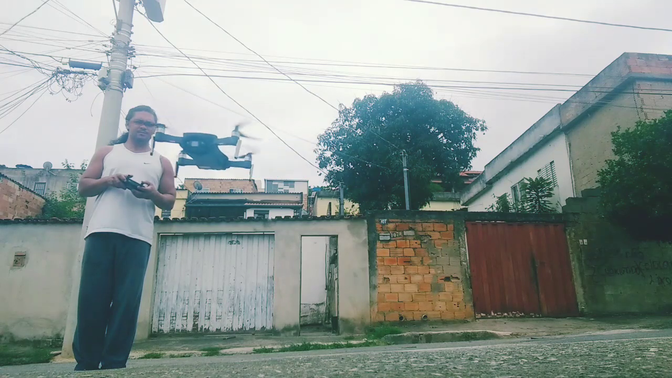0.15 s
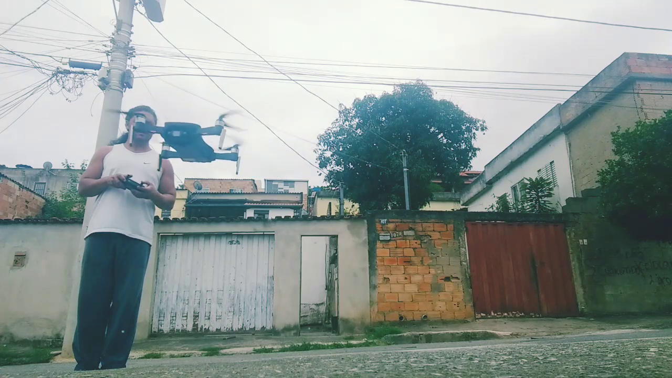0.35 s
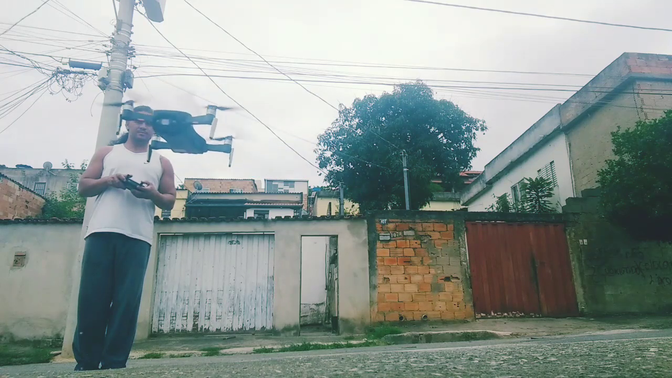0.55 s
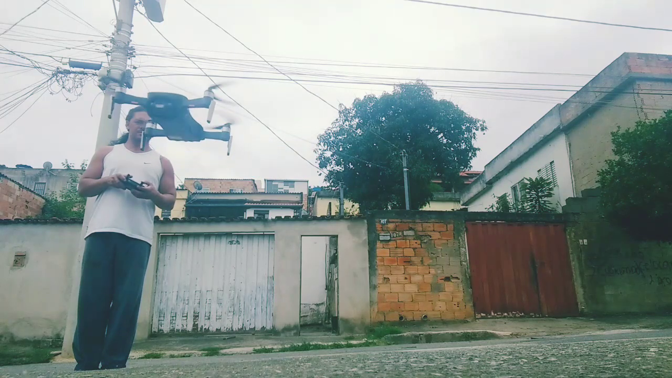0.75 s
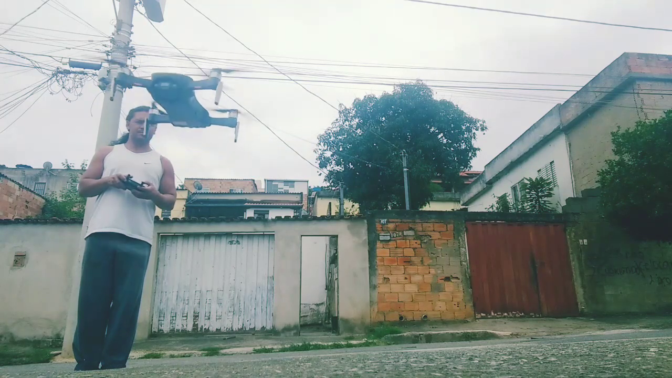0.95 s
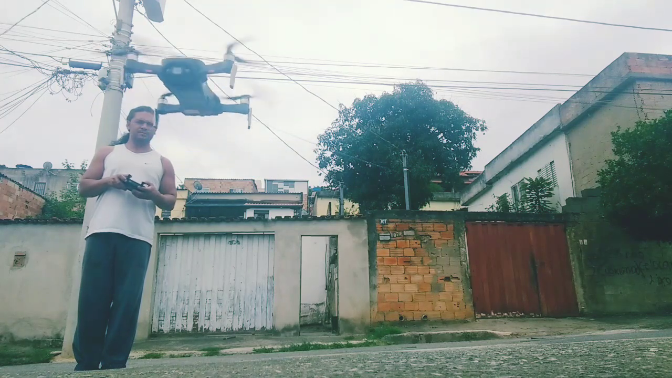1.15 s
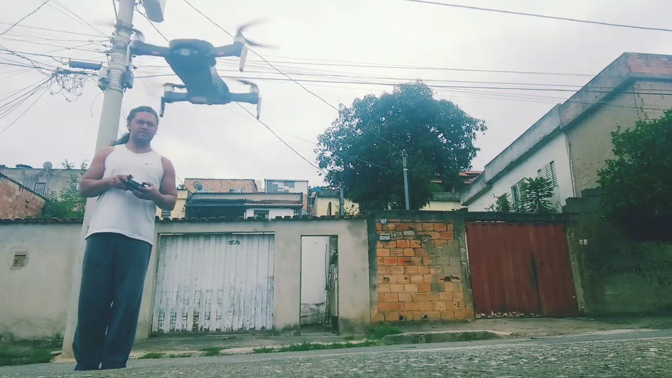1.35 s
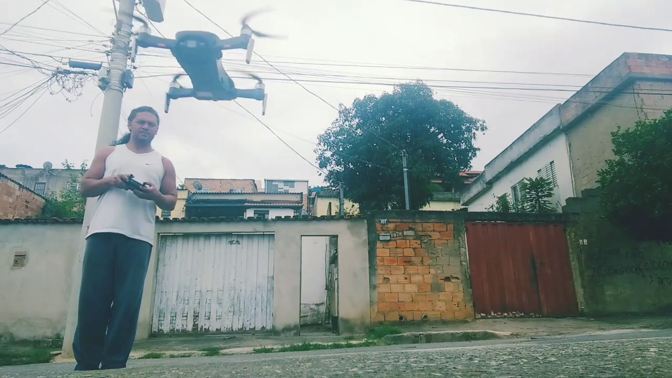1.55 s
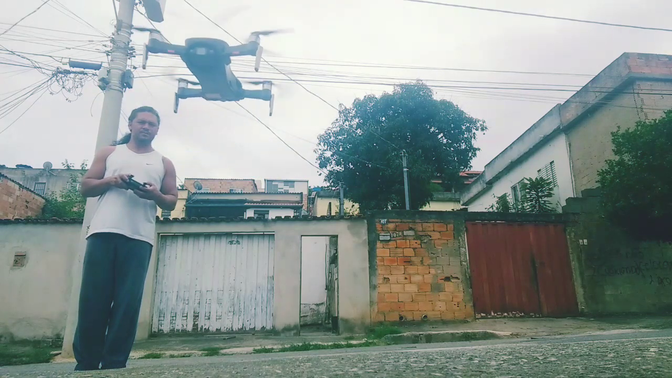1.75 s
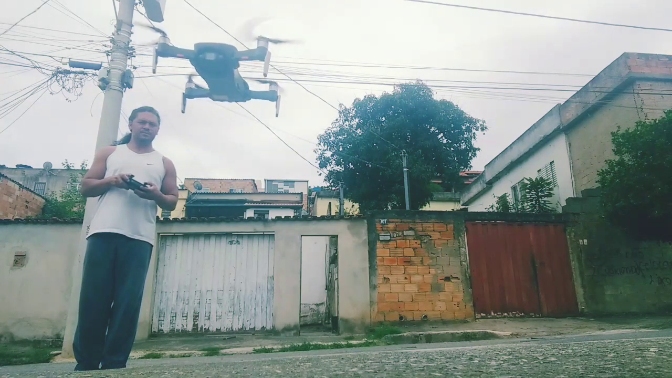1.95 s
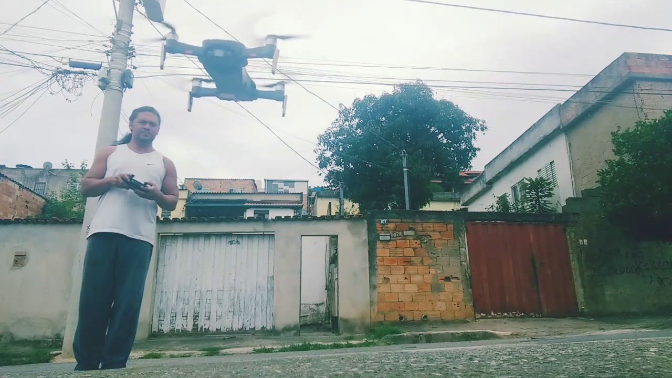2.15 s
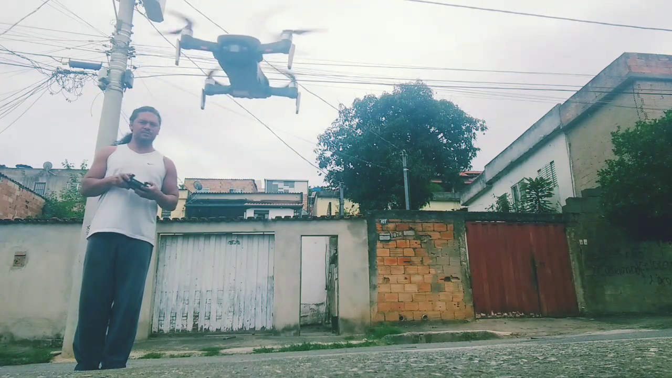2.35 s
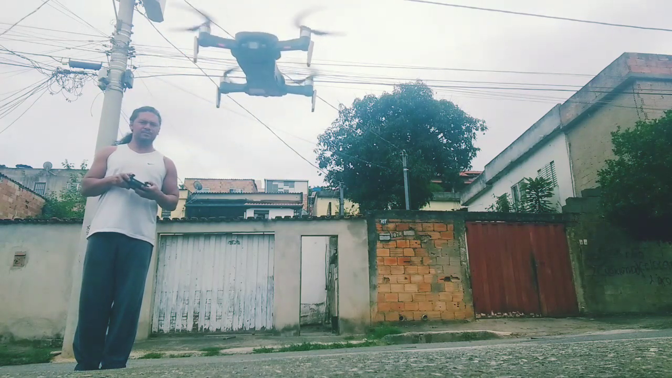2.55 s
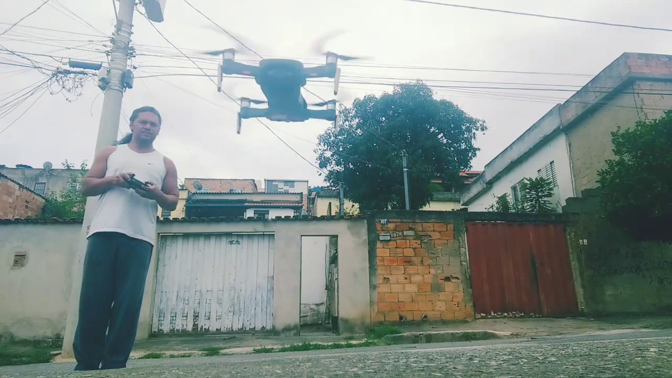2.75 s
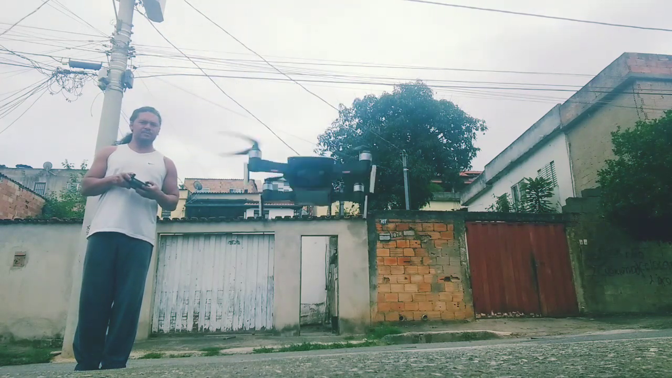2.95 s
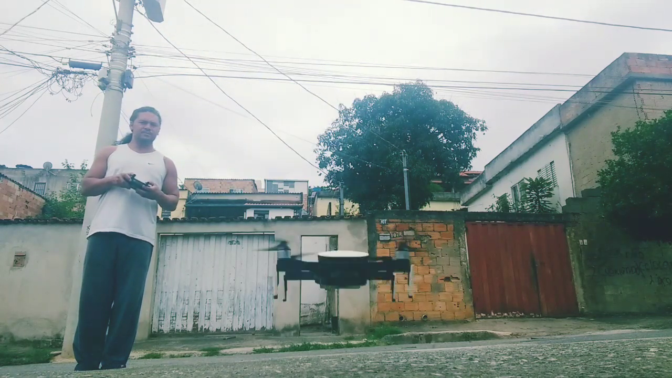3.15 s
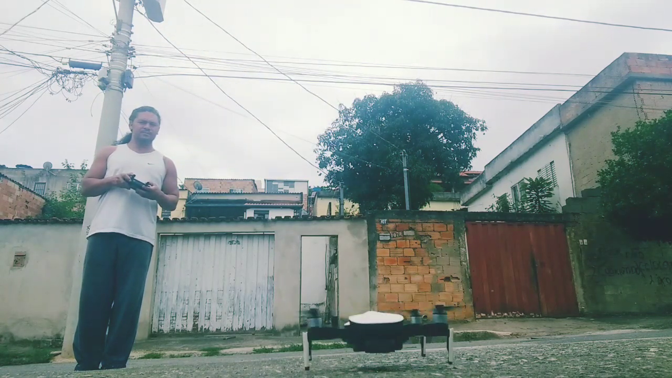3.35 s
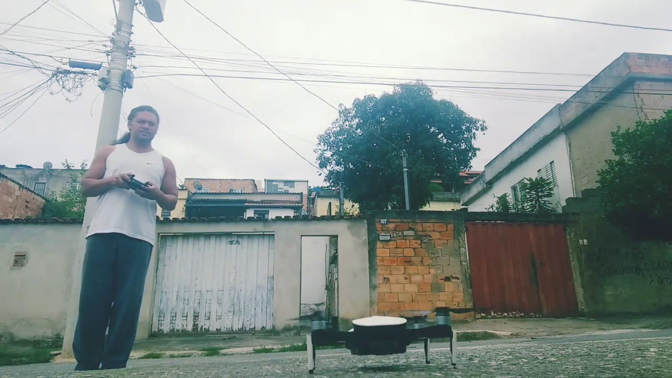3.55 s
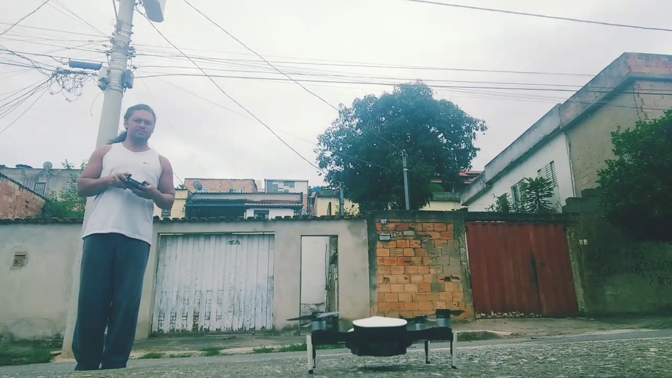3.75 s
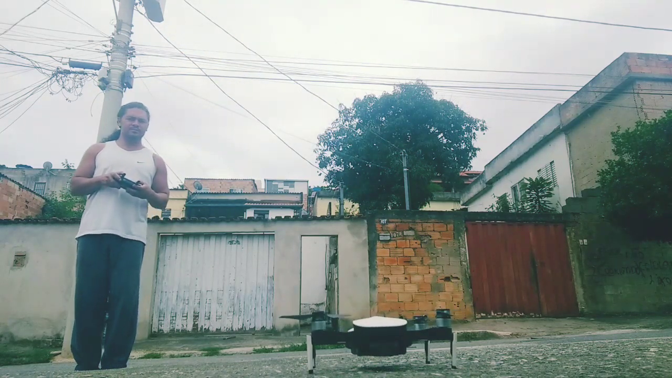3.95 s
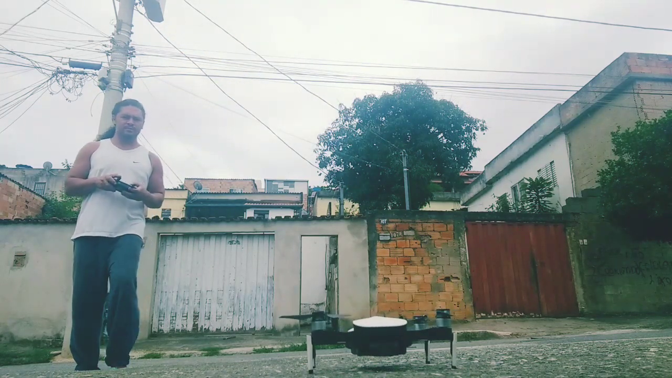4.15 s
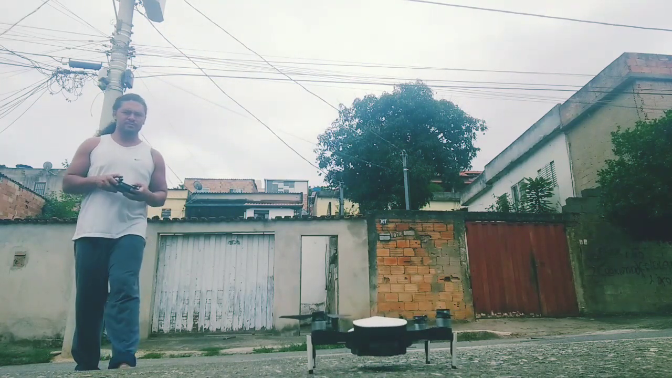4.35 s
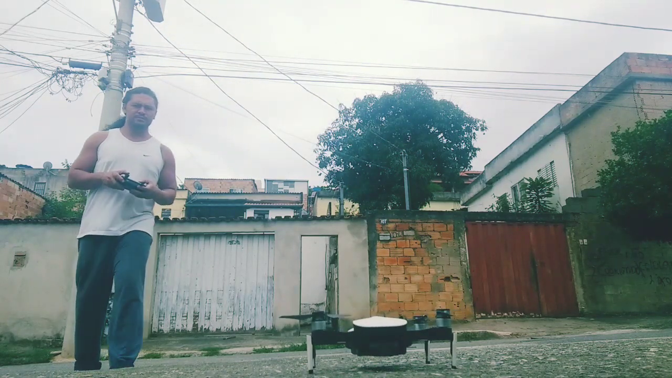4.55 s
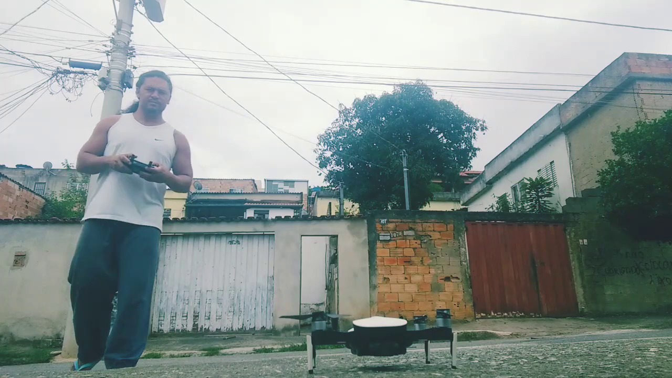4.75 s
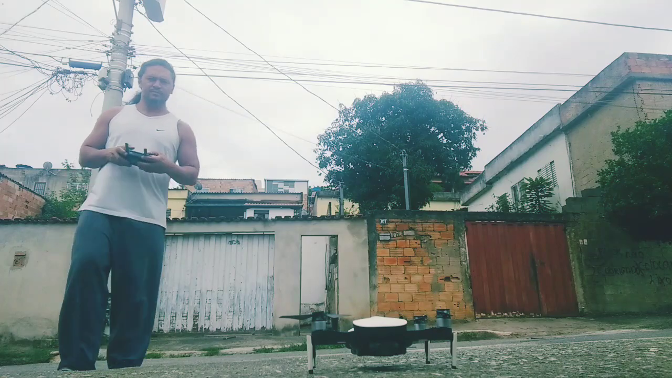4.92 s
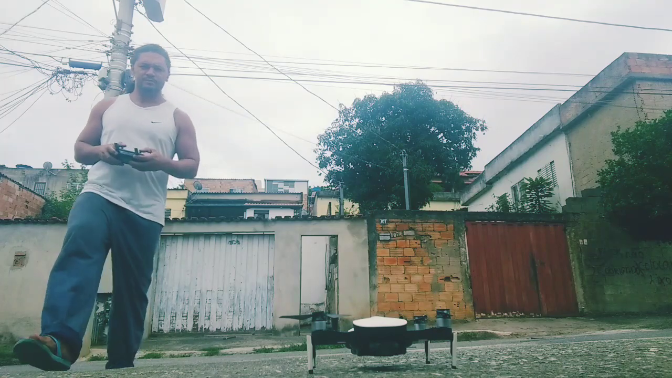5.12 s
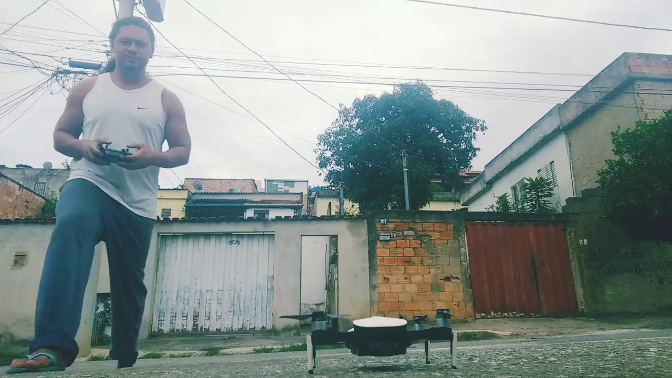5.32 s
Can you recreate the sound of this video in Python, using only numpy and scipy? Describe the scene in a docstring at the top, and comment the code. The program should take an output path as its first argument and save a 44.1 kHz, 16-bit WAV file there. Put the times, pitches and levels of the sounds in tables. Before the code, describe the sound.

A loud, wavering quadcopter buzz fills the first three and a half seconds, with airy hiss and irregular wind buffets striking a microphone near the ground. One brief rising chirp cuts through early. The rotors sag, surge, slow on touchdown and cut out abruptly. Then it is very quiet: a distant engine drone swelling under light hiss, soft bird notes and a few dragging footsteps on paving.

```python
"""A beating buzz and whine hovers close by, dips, sinks and stops: a quadcopter lands by a camera on the
ground. Its four rotors are overtone stacks at slightly different speeds, with chopped noise for the air they
push. Downwash thumps the two microphone ports as rumbling noise and short pressure pulses; a chirp cuts
through, and the plastic frame ticks as decaying noise. Then faint traffic with a droning engine under hiss
rises in level, a bird pipes gliding sine notes, and shoes scuff the paving in short bumps of noise."""
import sys
import numpy as np
from scipy.fft import rfft, irfft, next_fast_len
from scipy.io import wavfile
from scipy.ndimage import uniform_filter1d, minimum_filter1d, map_coordinates

SR = 44100
rng = np.random.default_rng(int(sys.argv[2]) if len(sys.argv) > 2 else 0)


def pcm_store(signal):
    """Save signal as 16-bit PCM."""
    levels = np.round(np.clip(np.atleast_2d(signal), -1, 1) * 32767)
    wavfile.write(sys.argv[1], SR, levels.astype(np.int16).T)


N = 237346
TIME = np.arange(N) / SR


def amp(db):
    """Decibels to gain."""
    return 10 ** (np.asarray(db) / 20)


def unit(x):
    """Scale to rms 1."""
    return x / np.sqrt(np.mean(x ** 2) + 1e-20)


def along(points, hz):
    """Read (frequency [Hz], value) points on a log frequency axis."""
    f, v = np.transpose(points)
    return np.interp(np.log(hz + 1e-3), np.log(f), v)


def curves(rows):
    """One value per sample for each column after the time; the end values are held."""
    s, *cols = np.transpose(rows)
    return [np.interp(TIME, s, c) for c in cols]


def wobble(rate):
    """A smooth random curve, rate knots a second."""
    return map_coordinates(rng.standard_normal(int(N * rate / SR) + 4), [TIME * rate])


def filtered(x, response):
    """x times a response of frequency."""
    size = next_fast_len(N + 8192)
    spectrum = rfft(x, size) * response(np.fft.rfftfreq(size, 1 / SR))
    return irfft(spectrum, size)[..., :N]


def noise(spectrum):
    """Coloured noise of rms 1, unrelated between the two ports."""
    return unit(filtered(rng.standard_normal((2, N)), lambda hz: amp(along(spectrum, hz))))


def bell(s, width):
    """A smooth bump in time."""
    return np.exp(-.5 * np.minimum(((TIME - s) / width) ** 2, 100))


def tone(phase, spread):
    """A partial that reaches the two ports with a phase difference [radians]."""
    start = rng.uniform(0, 2 * np.pi)
    ports = [phase + start - spread / 2, phase + start + spread / 2]
    return np.sin(np.array(ports, dtype=np.float32))


# base blade-passing rate in hover, dip, recovery, descent, idling and braking: (time [s], rate [Hz])
THROTTLE_POINTS = [(0, 367.9), (.6, 367.2), (1.2, 362.6), (2.64, 364.4), (2.68, 301.1), (2.73, 278.3),
                   (2.78, 300.2), (2.83, 328.4), (2.89, 355.2), (2.96, 363.1), (3.385, 350.8),
                   (3.45, 268.6), (3.53, 249.1), (3.6, 261.3), (3.72, 269.4), (3.92, 65.7)]
# rotors, the near one first: (hover speed [ratio], descent speed [ratio], part in rocking, part in tilting,
# part in turning, relative buzz level [dB], relative whine level [dB])
ROTOR_TRIMS = [(.99, .99, 0, 1, 0, .5, -12), (.979, .976, 1, .2, -.8, 1, 1.5),
               (.983, .945, .97, -.1, .8, -2.5, -3), (1.049, 1.057, -.9, .2, .8, -.5, -11)]
# how late each motor follows the throttle: (delay [s])
MOTOR_DELAYS = [0.00396, 0.00021, .014, .009]
# rocking to hold its place, one pair of rotors against the other: (time [s], share of speed [ratio])
ROCKING_POINTS = [(1.14, -0.0026), (1.22, -0.015), (1.33, 0.0075), (1.42, -0.014), (1.57, 0.035),
                  (1.68, -0.024), (1.8, .008), (2.02, -0.014), (2.14, 0.0017)]
# tilting towards the camera and back, mainly with the near rotor: (time [s], share of speed [ratio])
TILTING_POINTS = [(0, -0.0045), (.18, 0.0092), (.3, -0.00013), (.55, 0.0099), (.77, -0.019), (.87, 0.0078),
                  (1.02, -0.008), (1.14, 0.0059), (1.25, -0.02), (1.43, .012), (1.56, -0.027),
                  (1.69, 0.0023), (1.98, .011), (2.3, -0.0067), (2.63, -0.0039), (2.72, 0.036),
                  (2.82, -0.0056), (3.02, -0.0014), (3.15, -0.025)]
# turning pulls the two loudest motors apart, so their whines beat; on the ground they idle unequally:
# (time [s], share of speed [ratio])
TURNING_POINTS = [(1.8, -0.0004), (2.0, 0.006), (2.2, 0.0081), (2.64, 0.0037), (2.8, 0.0019),
                  (2.95, 0.0072), (3.1, 0.0056), (3.25, -0.007), (3.52, -0.012), (3.62, -.03),
                  (3.72, -0.037)]
DESCENT_S, DESCENT_BLEND_S = 3.02, .15  # start and length of the shift to descent speeds
WANDER, WANDER_RATE = .0025, 9  # own corrections: share of speed, knots a second


def rotor_rates(throttle_hz):
    """Each rotor's blade-passing rate: the throttle, followed a little late, trimmed and corrected all the time."""
    rocking, tilting, turning = [curves(p)[0] for p in (ROCKING_POINTS, TILTING_POINTS, TURNING_POINTS)]
    descent = np.clip((TIME - DESCENT_S) / DESCENT_BLEND_S, 0, 1)
    rates = []
    for (hover, sinking, rock, tilt, turn, _, _), late_s in zip(ROTOR_TRIMS, MOTOR_DELAYS):
        speed = hover + (sinking - hover) * descent
        speed = speed + rock * rocking + tilt * tilting + turn * turning
        speed = speed + WANDER * wobble(WANDER_RATE)
        rates.append(np.interp(TIME - late_s, TIME, throttle_hz) * speed)
    return rates


# how buzz, whine and hiss follow the rotors: (base level in hover [dB], slope [dB per octave of speed],
# part in the presence [ratio], fade after the power cut [dB/s])
BUZZ_RULE = (-34, 14, 1, 134)
WHINE_RULE = (-31.5, -1, 0.83, 403)
HISS_RULE = (-30.5, 15, 1, 354)
# louder and softer as the drone drifts and turns: (time [s], level [dB])
PRESENCE_POINTS = [(0, -0.5), (.22, 2.5), (.28, -2.5), (.6, -2.5), (.78, 1), (1, 1), (1.22, -2.5),
                   (1.7, 0.5), (2.3, -0.5), (2.66, -0.5), (2.9, 4.5), (3.2, -2), (3.39, 0), (3.7, -1)]
# level of the air rush before the fade: (time [s], level [dB])
RUSH_POINTS = [(0, -43), (.22, -37), (.28, -41.5), (.76, -33.5), (1.2, -33), (1.7, -31.5), (2.62, -35),
               (2.98, -41), (3.18, -35), (3.39, -32), (3.5, -42.5)]
# the whine comes and goes as the drone tips and sinks: (time [s], relative level [dB])
WHINE_POINTS = [(0, -2), (1.85, -2.5), (2.03, 1), (2.15, -1.5), (2.65, -1.5), (2.71, -12), (2.81, 0.5),
                (2.9, 0), (3.02, -6.5), (3.12, -30), (3.24, -0.5), (3.4, -1.5), (3.47, -4), (3.58, -0.5)]
CUT_S = 3.72  # the motors lose power
SURGE_DB, SURGE_RATE = 0.46, 13  # small shared surges of thrust: depth, knots a second
# just before the motors lose power, the buzz and hiss drop a little
DROP_S, DROP_FADE_S, BUZZ_DROP_DB, HISS_DROP_DB = 3.7, 0.024, 3.5, 2


def drone_levels(throttle_hz):
    """Buzz, whine, hiss and rush in dB: speed sets the first three, and all fade once the power is cut."""
    octaves = np.log2(throttle_hz / throttle_hz[0])
    presence_db = curves(PRESENCE_POINTS)[0] + SURGE_DB * wobble(SURGE_RATE)
    unpowered_s = np.maximum(TIME - CUT_S, 0)
    buzz, whine, hiss = [db + per_octave * octaves + part * presence_db - fade * unpowered_s
                         for db, per_octave, part, fade in (BUZZ_RULE, WHINE_RULE, HISS_RULE)]
    drop = np.clip((TIME - DROP_S) / DROP_FADE_S, 0, 1)
    rush = curves(RUSH_POINTS)[0] - HISS_RULE[-1] * unpowered_s
    whine = whine + curves(WHINE_POINTS)[0]
    return buzz - BUZZ_DROP_DB * drop, whine, hiss - HISS_DROP_DB * drop, rush


# high blade overtones, duller as the drone sinks: (time [s], relative level [dB])
EDGE_POINTS = [(0, -2), (.7, 0.5), (2.6, 2.5), (2.72, 1.5), (3.0, -4.5), (3.3, -2), (3.55, -1)]
# phase of the buzz between the ports: (frequency [Hz], phase [radians])
BUZZ_PHASE = [(360, 0.59), (720, 1.04), (1080, 1.52), (1800, 2.29), (2170, 1.96), (2550, 7.2), (2900, 7.8),
              (3250, 1.54), (4000, 1.44), (4700, 2.64), (5100, 2.5), (5500, 1.86), (6400, 1.6)]
# phase of the whine between the ports: (frequency [Hz], phase [radians])
WHINE_PHASE = [(4700, 1.45), (6400, 1.54)]


def rotor(rate_hz, overtones, jitter=0.00139, hunting=4, flicker_db=1.2, edge_hz=2500,
          imbalance=0.15, whine_sway=0.12, slow_db=3, count=24):
    """One propeller and its motor: blade buzz, whine and the phase of the blades."""
    # the speed trembles more while the throttle is changing
    change = uniform_filter1d(np.abs(np.gradient(np.log(rate_hz))) * SR, size=2000)
    tremble = jitter * (1 + hunting * np.minimum(change, 2)) * wobble(90)
    phase = 2 * np.pi * np.cumsum(rate_hz * (1 + tremble)) / SR
    # slower blades lose their high overtones
    fade_db = slow_db * (1 - rate_hz / rate_hz[0])
    # the low overtones follow only the negative part of the edge curve, and by half
    edge_db = curves(EDGE_POINTS)[0]
    hum_db = .5 * np.minimum(edge_db, 0)
    buzz = 0
    for k in range(1, count + 1):
        hz = k * rate_hz[0]
        level_db = along(overtones, k) - fade_db * np.log2(k) + (edge_db if hz > edge_hz else hum_db)
        # turbulent inflow loads the blades unevenly; the high overtones flicker most
        level_db = level_db + flicker_db * np.sqrt(k) * wobble(31.9)
        buzz = buzz + amp(level_db) * tone(k * phase, along(BUZZ_PHASE, hz))
    pulls = 18  # magnetic pulls of the motor per blade pass
    whine = amp(1.1 * wobble(24.8)) * tone(pulls * phase, along(WHINE_PHASE, pulls * rate_hz))
    # two unequal blades add sidebands at the shaft rate
    sway = np.cos(phase / 2)
    return (1 + imbalance * sway) * buzz, (1 + whine_sway * sway) * whine, phase


# blade-pass overtones of the near, the two middle and the fastest rotor: (multiple, relative level [dB])
NEAR_OVERTONES = [(1, 1.5), (2, -3.5), (3, 4.5), (4, -5), (5, -8), (6, 0.5), (7, -27), (8, -15), (9, -11.5),
                  (10, -13), (11, -9.5), (12, -6.5), (13, -13), (14, -6), (15, -9), (17, -9.5), (19, -9),
                  (22, -24), (24, -30)]
FAR_OVERTONES = [(1, -8), (2, -1), (3, -7.5), (4, -6), (5, -2), (8, -7), (10, -15), (12, -18), (16, -10),
                 (20, -21.5), (30, -52)]
FAST_OVERTONES = [(1, -6), (2, 1), (3, -8.5), (4, -13), (5, -68), (8, -45), (10, -22), (16, -11), (20, -22),
                  (30, -59)]
# near rotor's buzz, which turns away as the drone sinks: (time [s], relative level [dB])
NEAR_POINTS = [(1.2, 1.5), (1.6, 0), (2.0, -0.5), (2.65, -1.5), (2.88, -1), (3.0, 1.5), (3.15, -2),
               (3.35, -8), (3.45, -7)]
NEAR_DB_PER_OCTAVE = 3.5  # extra loss of the near buzz per octave of slowing
# colour of the air rush: (frequency [Hz], relative level [dB])
RUSH_COLOUR = [(150, -12), (500, -11), (1200, 13.5), (1700, 0.5), (2000, -31), (2750, -49), (3100, -2),
               (3600, 9.5), (4500, 15.5), (6000, 13), (7000, 3), (8500, -34), (10500, 9.5), (13000, -51)]
# colour of the blade hiss: (frequency [Hz], relative level [dB])
HISS_COLOUR = [(4000, -44), (6500, 3), (8000, 7.5), (10000, 1.5), (12000, -0.5), (14500, -7.5)]
# top treble of the hiss aimed at the camera: (time [s], relative level [dB])
SHEEN_POINTS = [(0, 6), (.8, 7.5), (1.3, -6), (1.8, -9), (2.65, -7), (2.9, -2), (3.15, -27), (3.7, 0)]
# air spilling over the paving once the drone is low: (frequency [Hz], relative level [dB])
SPILL_COLOUR = [(1200, -18), (1900, -7.5), (2500, -6), (3000, 0), (3600, -10.5), (5000, -18)]
# strength of that spill: (time [s], level [dB])
SPILL_POINTS = [(2.7, -44), (3.05, -31), (3.35, -28.5), (3.55, -32.5), (3.72, -32.5), (3.8, -49),
                (4.0, -97)]
# lag of the ground echo: (time [s], lag [ms])
GROUND_LAG = [(0, 0.044), (.6, 0.045), (1.3, 0.062), (2.6, 0.063), (2.9, 0.053), (3.1, 0.058), (3.3, 0.049),
              (3.7, 0.045)]
# port balance, positive to the right: (frequency [Hz], level [dB])
LEAN_EQ = [(300, 1.5), (1200, -0.5), (3000, 0), (6000, 2), (9000, 2), (13000, 3)]


def drone(chop=0.12, echo=0.69):
    """Four rotors beat against each other; the blades chop the air that they push."""
    throttle_hz = curves(THROTTLE_POINTS)[0]
    buzz_level, whine_level, hiss_level, rush_level = drone_levels(throttle_hz)
    near_db = curves(NEAR_POINTS)[0] + NEAR_DB_PER_OCTAVE * np.log2(throttle_hz / throttle_hz[0])
    blades = (NEAR_OVERTONES, FAR_OVERTONES, FAR_OVERTONES, FAST_OVERTONES)
    out, phases = np.zeros((2, N)), []
    for i, rate_hz in enumerate(rotor_rates(throttle_hz)):
        own_buzz_db, own_whine_db = ROTOR_TRIMS[i][-2:]
        buzz, whine, phase = rotor(rate_hz, blades[i])
        out += amp(buzz_level + own_buzz_db + (0 if i else near_db)) * buzz
        out += amp(whine_level + own_whine_db) * whine
        phases.append(phase)
    chopping = unit(1 + chop * (np.cos(phases[0]) + np.cos(phases[1])))
    # the highest treble is beamed, so it changes with the drone's angle
    hiss = noise(HISS_COLOUR)
    treble = filtered(hiss, lambda hz: 1 / (1 + (11800 / (hz + 1)) ** 12))
    hiss += (amp(curves(SHEEN_POINTS)[0]) - 1) * treble
    air = amp(rush_level) * noise(RUSH_COLOUR)
    air += amp(hiss_level + 1.33 * wobble(24.19)) * hiss
    air += amp(curves(SPILL_POINTS)[0]) * noise(SPILL_COLOUR)
    air *= chopping
    # the paving right under the camera adds an echo that combs the treble as the drone moves
    lag_s = curves(GROUND_LAG)[0] / 1000
    air += echo * np.array([map_coordinates(port, [(TIME - lag_s) * SR]) for port in air])
    return filtered(out + air, lambda hz: amp(np.outer([-1, 1], along(LEAN_EQ, hz))))


# strength of the downwash at the ports: (time [s], relative level [dB])
WASH_POINTS = [(0, -14.5), (.55, -19.5), (1, -9.5), (1.3, -11), (1.6, -9.5), (1.9, -13.5), (2.55, -9.5),
               (2.8, -17), (3, -6.5), (3.12, -14), (3.28, -5), (3.5, -18), (3.6, -35.5), (3.73, -17.5),
               (3.92, -31), (4.2, -49)]
# colour of the rumble, also inside the eddies: (frequency [Hz], relative level [dB])
RUMBLE_COLOUR = [(20, -57), (40, -10), (70, -1.5), (110, 3.5), (200, 3), (350, -4), (600, -10.5),
                 (1000, -18), (1600, -24.5), (2500, -44), (5000, -60)]


def downwash(wash_db=-17, lumps_db=4.5, gust_db=2.5):
    """Lumpy turbulence rumbles on each port between the strong eddies."""
    flow_db = curves(WASH_POINTS)[0] + gust_db * wobble(10.22)
    lumps = amp(lumps_db * np.array([wobble(70), wobble(70)]))
    churn = unit(noise(RUMBLE_COLOUR) * lumps)
    # slow air makes only large, dull eddies
    dull = filtered(churn, lambda hz: 1 / (1 + (hz / 260) ** 4))
    brisk = np.clip((flow_db + 29.5) / 14, 0, 1)
    return amp(flow_db + wash_db) * (dull + brisk * (churn - dull))


def distant(x, apart):
    """Far sound reaches both ports alike in the bass; apart sets their difference."""
    difference = filtered(x[1], lambda hz: amp(along(apart, hz)))
    return np.array([x[0] + difference, x[0] - difference])


# faint street; its level rises after the drone is still: (time [s], relative traffic [dB], relative hiss [dB])
STREET_POINTS = [(3.95, -50, -49.5), (4.4, -42.5, -45), (5, -34.5, -41), (5.38, -36, -46)]
# colour of the traffic: (frequency [Hz], relative level [dB])
TRAFFIC_COLOUR = [(25, -24), (55, -3), (90, -1), (160, 0), (220, -4.5), (400, -4), (650, -5), (1000, -9),
                  (1400, -12), (2000, -9.5), (2800, -3.5), (5000, -46.5)]
# colour of the light hiss: (frequency [Hz], relative level [dB])
AIR_COLOUR = [(1500, -4), (2700, 4.5), (3700, -0.5), (4900, 0.5), (5400, -5.5), (6200, -16.5), (6430, -4),
              (6650, -14), (8000, -21), (11000, -35), (14500, -49)]
# partials of the far engine drone: (centre frequency [Hz], relative level [dB])
ENGINE_PARTIALS = [(89, -0.5), (124, -4), (168, -6), (268, -5), (340, -8)]


def street(traffic_db=-1, engine_db=-6, air_db=0, left_db=0.67):
    """Far traffic is coloured noise with one engine of wavering sines, under a light hiss."""
    traffic_level, air_level = curves(STREET_POINTS)
    engine = 0
    for hz, db in ENGINE_PARTIALS:
        level = amp(db + 2.3 * wobble(6.1))
        phase = 2 * np.pi * np.cumsum(hz * (1 + 0.0147 * wobble(14))) / SR
        engine = engine + level * np.sin(phase)
    apart = [(80, -29.0), (200, -10.0), (400, -6.5), (900, 4.5), (1500, -1.5)]  # (frequency [Hz], level [dB])
    roar = distant(noise(TRAFFIC_COLOUR), apart)
    low = amp(traffic_level) * (amp(traffic_db) * roar + amp(engine_db) * engine)
    hiss = amp(air_level + air_db) * noise(AIR_COLOUR) * amp([[1], [2.5]])
    return low * amp([[left_db], [-left_db]]) + hiss


def push(t, span):
    """Pressure of one eddy passing a port at t = 0: a suction between two humps."""
    return ((t / span) ** 2 - 1) * np.exp(-.5 * np.minimum((t / span) ** 2, 100))


def burst(x, t, length):
    """A short piece of turbulence around t = 0, with rms 1 at its height."""
    envelope = np.exp(-np.minimum((2 * t / length) ** 2, 100))
    return x * envelope * np.sqrt(np.sum(envelope ** 2) / np.sum((x * envelope) ** 2))


# strongest eddies that strike a port: (time [s], length [s], relative rumble [dB], relative flutter [dB])
EDDY_HITS = [(0.025, 0.023, -38, -38.5), (0.104, 0.013, -26.5, -24.5), (0.144, 0.015, -25, -30),
             (0.249, 0.014, -10, -29), (0.342, 0.033, -31, -36), (0.434, 0.027, -14.5, -22),
             (0.498, 0.012, -24, -34), (0.594, 0.011, -22, -47), (0.672, 0.01, -15, -18),
             (0.751, 0.027, -22, -24.5), (0.832, 0.012, -16, -20), (0.878, 0.018, -24, -30),
             (0.934, 0.014, -23, -36), (0.978, 0.022, -16.5, -22), (1.088, 0.017, -21, -15.5),
             (1.147, 0.011, -15, -24), (1.197, 0.012, -27, -19), (1.262, 0.022, -24, -18),
             (1.295, 0.024, -21.5, -20), (1.332, 0.022, -25, -15.5), (1.39, 0.027, -17, -23),
             (1.445, 0.014, -14, -21), (1.517, 0.024, -22, -21), (1.593, 0.018, -23.5, -21),
             (1.634, 0.02, -21, -17), (1.668, 0.018, -30, -24), (1.707, 0.012, -26, -23),
             (1.744, 0.018, -20, -15), (1.781, 0.0089, -17, -19.5), (1.828, 0.01, -33, -22),
             (1.868, 0.01, -31, -19.5), (1.909, 0.013, -33, -20.5), (2.044, 0.02, -14.5, -16.5),
             (2.09, 0.015, -23, -21.5), (2.173, 0.024, -25, -23), (2.216, 0.014, -16.5, -44),
             (2.274, 0.036, -25.5, -31), (2.309, 0.012, -12, -22), (2.342, 0.018, -24, -23),
             (2.412, 0.0079, -31, -12), (2.531, 0.016, -21, -16), (2.581, 0.011, -14, -16),
             (2.617, 0.017, -20, -24), (2.659, 0.018, -17, -22), (2.761, 0.02, -19, -24.5),
             (2.818, 0.015, -19, -23), (2.932, 0.016, -19, -15.5), (2.981, 0.023, -20.5, -19),
             (3.033, 0.022, -14, -22), (3.065, 0.018, -21.5, -10.5), (3.153, 0.019, -25, -19.5),
             (3.178, 0.026, -31, -23), (3.246, 0.024, -32, -17), (3.299, 0.024, -23, -16),
             (3.326, 0.027, -26, -18), (3.362, 0.032, -27, -20.5), (3.427, 0.018, -21.5, -35),
             (3.511, 0.014, -19, -29)]
# last slow swirls of air as the blades stop: (time [s], relative level [dB])
SWIRL_HITS = [(3.714, -14), (3.732, -17), (3.772, -23), (3.796, -29), (3.823, -20), (3.875, -20.5),
              (3.921, -20.5)]
# colour of a fast eddy tearing at a port: (frequency [Hz], relative level [dB])
FLUTTER_COLOUR = [(60, -22.5), (150, -5), (350, 4), (600, 2), (1000, -4.5), (1600, -14), (2500, -59),
                  (5000, -55)]


def eddies(push_db=3, rumble_db=-1, snap_db=7.5, flutter_db=-1, spill=0.24, push_share=0.099,
           snap_width=0.00041, swirl_db=-14.0, swirl_width=0.0024, swirl_rumble_db=-16, swirl_length_s=0.025):
    """Each eddy strikes one port with a push and a snap, in a burst of rumble and flutter; long ones push slowly."""
    out, rumble, flutter = np.zeros((2, N)), noise(RUMBLE_COLOUR), noise(FLUTTER_COLOUR)
    for (s, length, low_db, high_db), side in zip(EDDY_HITS, rng.random(len(EDDY_HITS))):
        port, near = int(side > .5), np.abs(TIME - s) < 2 * length
        t = TIME[near] - s
        out[port, near] += amp(low_db + push_db) * push(t, push_share * length)
        out[port, near] += amp(low_db + rumble_db) * burst(rumble[port, near], t, length)
        out[port, near] += amp(high_db + flutter_db) * burst(flutter[port, near], t, length)
        snap = amp(high_db + snap_db) * push(t, snap_width)
        out[port, near] += snap
        # part of the snap carries over to the other port
        out[1 - port, near] += spill * snap
    for (s, db), side in zip(SWIRL_HITS, rng.random(len(SWIRL_HITS))):
        port, t = int(side > .5), TIME - s
        out[port] += amp(db + swirl_db) * push(t, swirl_width)
        out[port] += amp(db + swirl_rumble_db) * burst(rumble[port], t, swirl_length_s)
    return out


def chirp(at_s=0.65, length_s=0.028, pitch_hz=1730, rise_hz_per_s=9000, db=-34):
    """One brief sine of rising pitch cuts through the hover."""
    t = np.clip(TIME - at_s, -4 * length_s, 4 * length_s)
    phase = 2 * np.pi * (pitch_hz * t + .5 * rise_hz_per_s * t ** 2)
    return amp(db) * bell(at_s, length_s / 2) * tone(phase, 0.66)


# short dry ticks of the plastic frame, one in the hover and the rest around the landing:
# (time [s], relative level [dB])
TICK_HITS = [(.661, -12), (3.3854, -12), (3.5175, -9.5), (3.603, -16.5), (3.7151, -18), (3.754, -25)]


def frame_and_brakes(tick_db=-6.0, t60=0.034, squeak_hz=4480, squeak_db=-36, coast_db=-54, brake_s=3.789,
                     squeak_width=0.01, rasp_db=-44, rasp_width=0.022):
    """The plastic frame ticks; the motors squeak and rasp as they brake and sing faintly while they coast."""
    blows = sum(amp(db + tick_db - 60 * np.abs(TIME - s) / t60) * (TIME >= s) for s, db in TICK_HITS)
    # noise colours: (frequency [Hz], relative level [dB])
    plastic = noise([(300, -50), (1500, 4), (4000, 3.0), (7000, -8.5), (14000, -27)])
    grind = noise([(600, -21), (1300, 3), (3000, -12), (4600, -1), (6500, -11), (9000, -10), (14000, -39)])
    rasp = amp(rasp_db) * bell(brake_s + rasp_width / 2, rasp_width) * grind
    squeak = tone(2 * np.pi * np.cumsum(squeak_hz * (1 + 0.0171 * wobble(400))) / SR, 0.47)
    squeak_level = amp(squeak_db) * bell(brake_s, squeak_width) + amp(coast_db) * bell(3.99, 0.12)
    return blows * plastic + rasp + squeak_level * squeak


# piped notes: (time [s], length [s], relative level [dB])
BIRD_NOTES = [(3.854, 0.054, -53), (3.933, 0.047, -55), (4.016, 0.047, -50), (4.163, .07, -46),
              (4.312, 0.072, -45.5), (4.471, 0.033, -39.5), (4.63, 0.047, -39.5)]


def bird(top_hz=1562, droop_hz=45, linger_db=-13, linger_s=0.051):
    """A run of slightly arched piping notes from far away, lingering between the house walls."""
    arch = sum(bell(s, length / 2) for s, length, db in BIRD_NOTES)
    held = sum(amp(db) / (1 + ((TIME - s) / (length / 2)) ** 6) for s, length, db in BIRD_NOTES)
    echoes = sum(amp(db + linger_db) * bell(s + length, linger_s) for s, length, db in BIRD_NOTES)
    pitch_hz = top_hz - droop_hz * (1 - arch) + 11 * wobble(140)
    piping = tone(2 * np.pi * np.cumsum(pitch_hz) / SR, 1.4)
    return amp(1.8 * wobble(70)) * (held + echoes) * piping


# shoe scuffs: (time [s], relative level [dB])
SCUFF_HITS = [(4.47, -49), (4.78, -63), (4.95, -43), (5.30, -46)]
# colour of the grit: (frequency [Hz], relative level [dB])
SCUFF_COLOUR = [(1500, -22), (3500, 11), (5000, 4), (8000, -7), (14000, -20)]


def footsteps(width=0.033):
    """Soles drag briefly over grit: bumps of coloured noise with a rough level."""
    drags = sum(amp(db) * bell(s, width) for s, db in SCUFF_HITS)
    return drags * noise(SCUFF_COLOUR) * amp(2.8 * wobble(300))


def scene():
    """Everything that reaches the two ports."""
    wind = (downwash() + eddies()) * amp([[-1.5], [1.5]])
    return drone() + wind + street() + chirp() + frame_and_brakes() + bird() + footsteps()


def limited(x, ceiling=0.93):
    """A look-ahead limiter ducks everything briefly around the largest thumps."""
    needed = np.minimum(1, ceiling / (np.abs(x).max(axis=0) + 1e-9))
    held = minimum_filter1d(needed, size=201)
    return x * uniform_filter1d(uniform_filter1d(held, size=101), size=101)


# stereo shaping on the sum of the ports: (frequency [Hz], level [dB])
MID_EQ = [(1400, 3), (1800, -4.5), (2100, -9.5), (2450, -36), (2800, -19.5), (3300, -2.5), (3800, 2.5),
          (5000, -5.5), (6400, 3.5), (7600, -1.5), (9200, 7), (10100, 0.5), (11000, 3.5)]
# stereo shaping on the difference of the ports: (frequency [Hz], level [dB])
SIDE_EQ = [(22, -42), (60, 21), (110, 18), (200, 12.5), (380, 8), (700, -1.5), (950, -9), (1220, -20),
           (1550, -3.5), (2300, -4.5), (3000, -8.5), (3700, -7.5), (4600, -0.5), (6400, -4.5), (7500, 4),
           (14000, 3)]
TOP_HZ = 14250  # the sound stays below this


def record(dry):
    """The stereo sum and difference are shaped, the peaks are limited, and the sound stays below TOP_HZ."""
    mid = filtered((dry[0] + dry[1]) / 2, lambda hz: amp(along(MID_EQ, hz)))
    side = filtered((dry[0] - dry[1]) / 2, lambda hz: amp(along(SIDE_EQ, hz)))
    stereo = limited(np.array([mid + side, mid - side]))
    return filtered(stereo, lambda hz: hz < TOP_HZ)


dry = scene()
out = record(dry)
pcm_store(out)
```